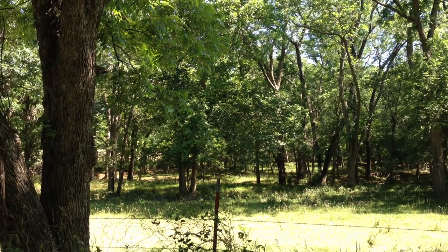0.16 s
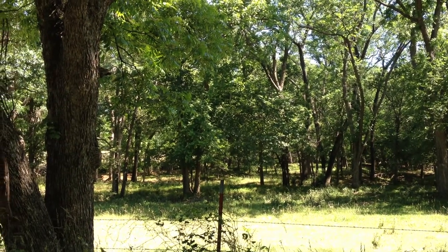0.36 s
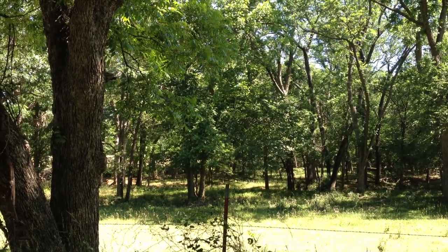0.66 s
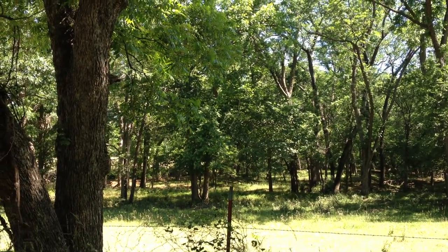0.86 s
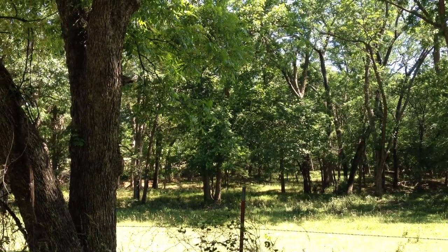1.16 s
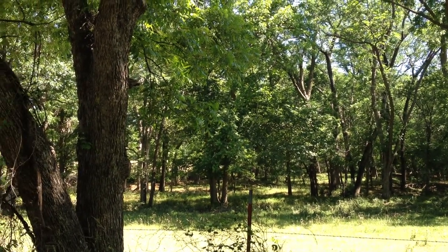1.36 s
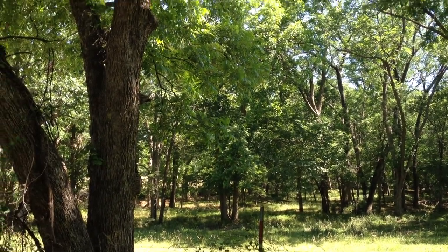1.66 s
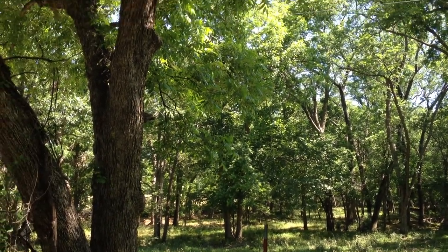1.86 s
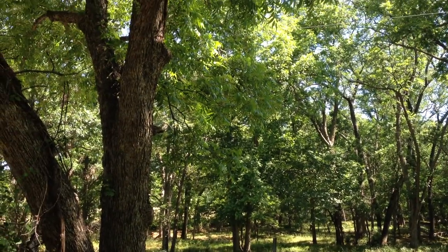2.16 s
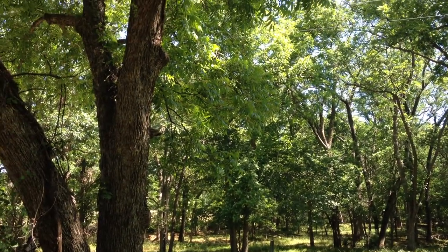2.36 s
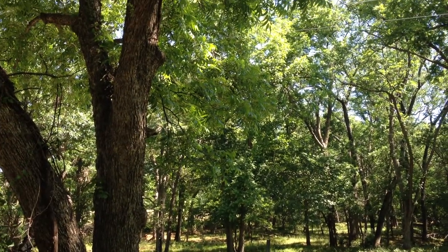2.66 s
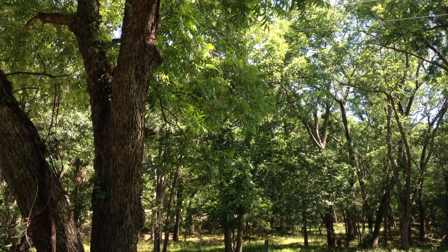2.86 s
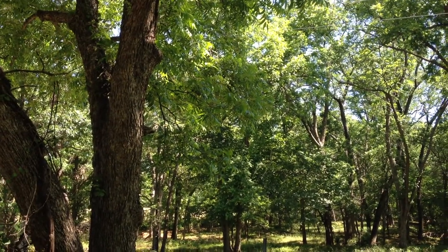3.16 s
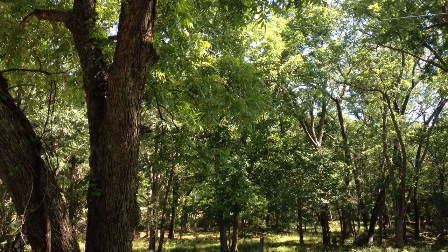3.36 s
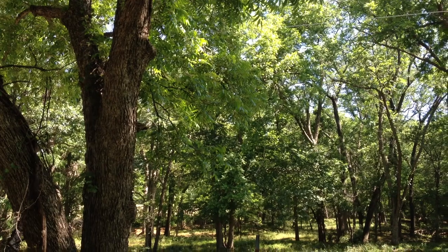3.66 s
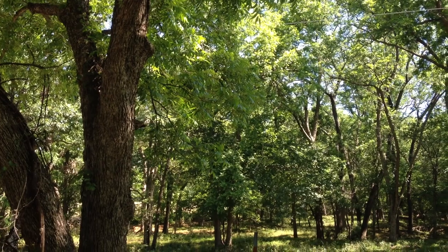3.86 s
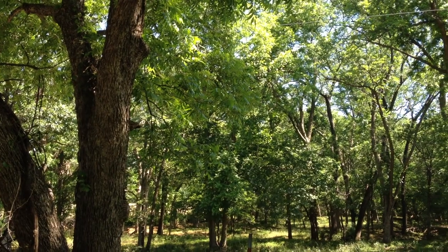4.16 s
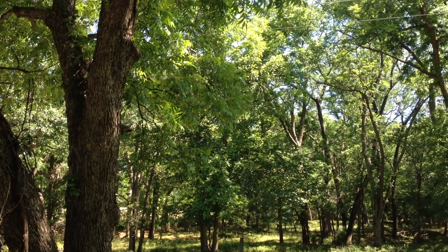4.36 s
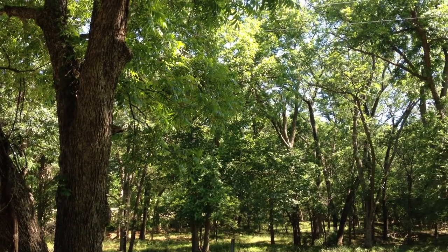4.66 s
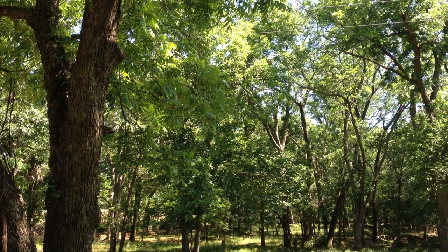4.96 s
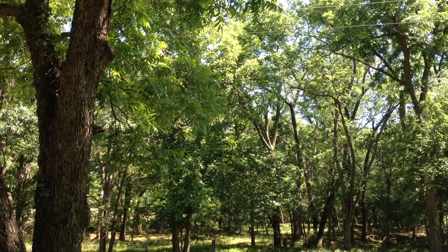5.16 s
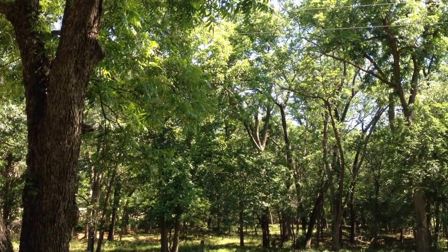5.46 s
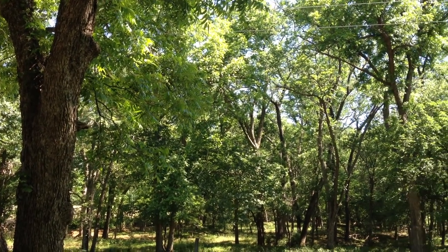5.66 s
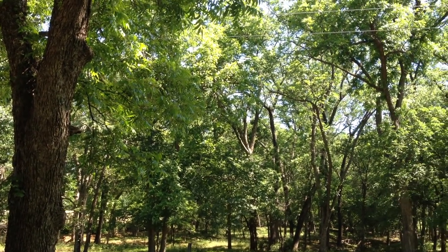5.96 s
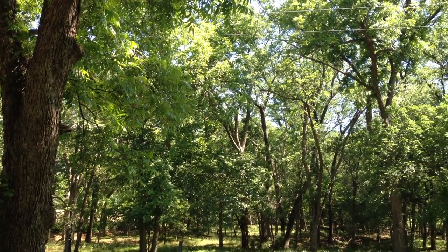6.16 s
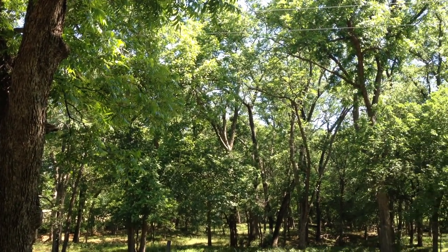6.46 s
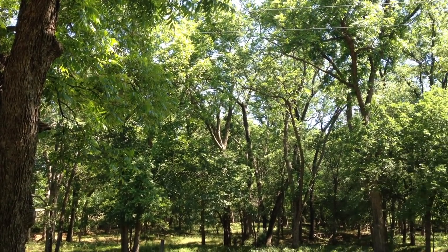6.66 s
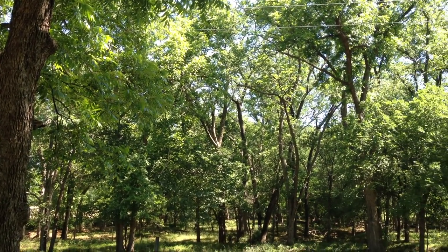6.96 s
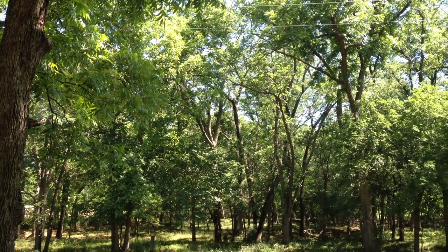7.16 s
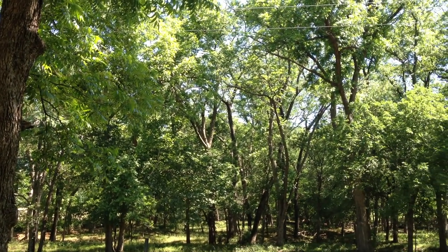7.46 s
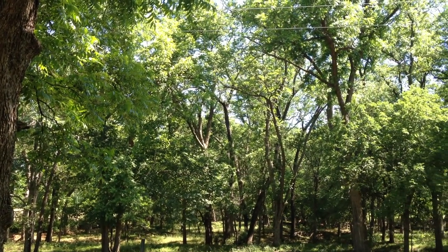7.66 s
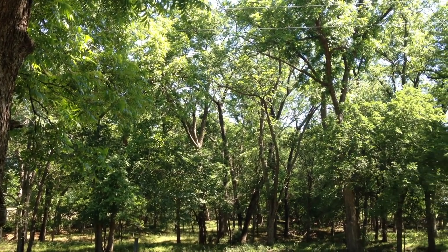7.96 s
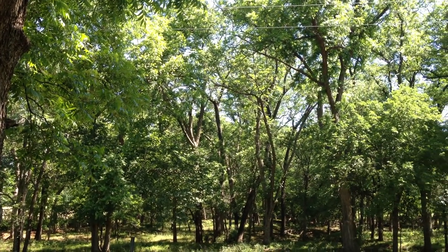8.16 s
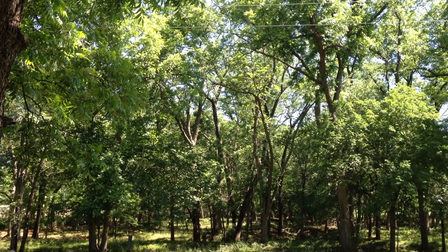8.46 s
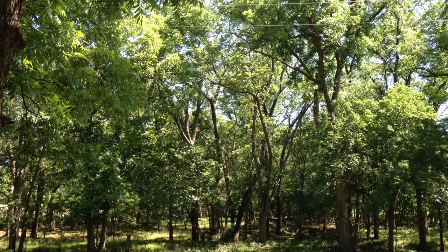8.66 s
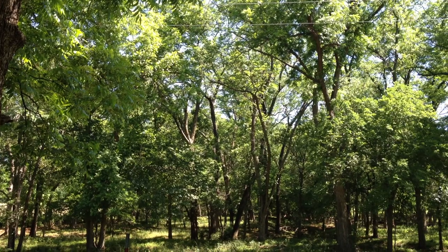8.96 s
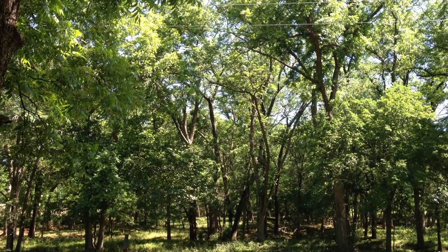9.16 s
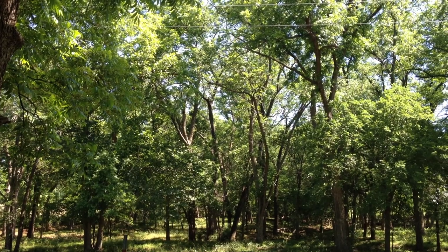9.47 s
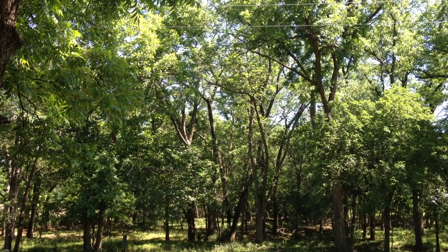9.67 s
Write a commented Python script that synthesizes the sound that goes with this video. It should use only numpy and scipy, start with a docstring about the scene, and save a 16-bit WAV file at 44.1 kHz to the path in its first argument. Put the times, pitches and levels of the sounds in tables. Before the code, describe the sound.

A massed chorus of cicadas fills a sunny wood with a dense, bright hiss. It starts low in a lull, swells slowly to a crest near four seconds, drops away within about a second, then builds again to a crest near nine and starts fading. Very quiet still air lies beneath. Small dull thuds and ticks from a hand on the camera sound close to the microphone, most noticeably around four to six seconds.

```python
"""Cicada chorus in waves

Periodical cicadas sing in the trees of an open wood; the whole chorus swells and fades about every five seconds.
Hundreds of ribbed membranes click; leaves smear the clicks into a hiss near 6 kHz with an overtone near 12 kHz.
Under it lies a quiet bed of still air and distant rumble, made of filtered noise.
A hand shifts on a camera's shell: short damped rings make faint thuds and ticks, and one small high tick."""
import sys
import numpy as np
from scipy import signal
from scipy.fft import rfft, irfft
from scipy.io import wavfile
from scipy.ndimage import uniform_filter1d

SR = 44100
rng = np.random.default_rng(int(sys.argv[2]) if len(sys.argv) > 2 else 0)


def dump_mix(stems):
    """Bounce the given channels to the path in sys.argv[1] as a 16-bit WAV at rate SR."""
    frames = np.atleast_2d(stems).T  # one column per channel
    limited = np.clip(frames, -1, 1)  # hard clip at full scale
    pcm = np.round(limited * 32767).astype(np.int16)
    wavfile.write(sys.argv[1], SR, pcm)


N = 432180  # length in samples

# waves of the chorus: crest_s, swell_s, crest_level_db, overtone_rise_db (above its lull)
CHORUS_WAVES = [(-1.19, 3.5, -20, 3), (4.08, 3.7, -21.2, 2.1), (9.14, 3.1, -21.7, 3.5)]
TREES, SINGERS = 12, 25  # trees, and singers in each


def gain_of(db):
    """Decibels to an amplitude factor."""
    return 10 ** (np.asarray(db) / 20)


def evened(x):
    """Scale to an RMS of one."""
    return x / np.sqrt(np.mean(x ** 2) + 1e-20)


def read(points, hz):
    """Read a spectral curve in dB between its points, along a logarithmic pitch axis."""
    point_hz, value_db = np.transpose(points)
    return np.interp(np.log(hz + 1), np.log(point_hz + 1), value_db)


def tymbals(clicks_per_s, spread_db, bout_s, bout_db):
    """The singers of one tree: each clicks at its own uneven rate and strength, in bouts that come and go."""
    rate, near, bout, phase = rng.random((4, SINGERS, 1))
    gap, size = rng.standard_normal((2, SINGERS, 4000))
    singer_rate = clicks_per_s * (.8 + .4 * rate)
    click_s = np.cumsum(np.exp(.3 * gap), 1) / singer_rate
    bout_cycles = click_s / (bout_s * (.5 + bout)) + phase
    loud_db = spread_db * near + bout_db * np.sin(2 * np.pi * bout_cycles)
    clicks = np.sign(size) * gain_of(loud_db)  # random polarity
    heard = click_s < N / SR
    return np.bincount((click_s[heard] * SR).astype(int), clicks[heard], N)


def leaves(x, t60, rise_s, direct_db):
    """Scattering among leaves and trunks smears every click; the leaves stir, so the path renews each 0.2 s."""
    size = SR // 5
    t = np.arange(size) / SR
    moments = np.pad(x, (0, -N % size)).reshape(-1, size)
    envelope = gain_of(-60 * t / t60) * (1 - np.exp(-t / rise_s))
    tails = rng.standard_normal(moments.shape) * envelope
    tails /= np.linalg.norm(tails, axis=1, keepdims=True)
    smeared = irfft(rfft(moments, 2 * size) * rfft(tails, 2 * size))
    smeared[1:, :size] += smeared[:-1, size:]  # each tail rings on into the next moment
    return gain_of(direct_db) * x + smeared[:, :size].ravel()[:N]


def wave(t, crest_s, swell_s):
    """A long steady swell from 0 to 1, then a quick fade that steepens."""
    fade_s, swell_bend, fade_bend = 1.3, 1.3, 1.7
    swell = np.clip(1 - (crest_s - t) / swell_s, 0, 1) ** swell_bend
    return swell * (1 - np.clip((t - crest_s) / fade_s, 0, 1) ** fade_bend)


def level(t):
    """Level of the song in dB, lifted from the lull by each wave as singers join and drop out together."""
    lull_db = -31.0
    return lull_db + sum((db - lull_db) * wave(t, s, swell_s) for s, swell_s, db, _ in CHORUS_WAVES)


def chorus():
    """The blurred clicks take the colour of the insects' bodies, which shifts between trough and crest."""
    # colour of the song at the crest of a wave: pitch_hz, density_db (per Hz, relative)
    song_colour = [(1200, -64), (1800, -46.5), (3010, -29.5), (3950, -10.5), (5450, -3.5), (6260, 2),
                   (6750, -1), (7670, -13), (8610, -14.5), (9700, -33.5), (11000, -24.5), (12500, -24.5),
                   (14100, -39.5), (15200, -39.5)]
    # added in a trough, where the flanks stand higher against the main band: pitch_hz, lift_db
    trough_lift = [(1500, 11), (3000, 3.5), (4500, 6), (6300, 3), (8500, 3.5), (12000, 6.5), (15000, 6)]
    crest_db, trough_db = -22, -31  # song levels at which the colour is fully crest or trough
    overtone_lull_db, overtone_lag_s = -1.2, .15  # the overtone crests a little after the main band

    # every tree has its own path through the wood
    clicks = np.zeros(N)
    for _ in range(TREES):
        tree = tymbals(clicks_per_s=220, spread_db=7.5, bout_s=.4, bout_db=2)
        clicks += leaves(tree, t60=.12, rise_s=0.0031, direct_db=-3.5)

    hz, t, spectrum = signal.stft(clicks, SR, nperseg=512, noverlap=384)
    hz = hz[:, None]
    overtone_db = overtone_lull_db + sum(db * wave(t - overtone_lag_s, s, swell_s)
                                         for s, swell_s, _, db in CHORUS_WAVES)
    overtone_band = np.clip((hz - 9000) / 1200, 0, 1)
    crest = np.clip((level(t) - trough_db) / (crest_db - trough_db), 0, 1)
    colour_db = read(song_colour, hz) + (1 - crest) * read(trough_lift, hz) + overtone_db * overtone_band
    # equal power at each moment, so that level() alone sets the waves
    colour = gain_of(colour_db) / np.linalg.norm(gain_of(colour_db), axis=0)

    # slow, faint patches of louder and softer colour
    patches = uniform_filter1d(rng.standard_normal(spectrum.shape), 7, 0)
    patches = uniform_filter1d(patches, 30, 1)
    coloured = spectrum * colour * gain_of(0.58 * evened(patches))
    song = evened(signal.istft(coloured, SR, nperseg=512, noverlap=384)[1][:N])
    return song * gain_of(level(np.arange(N) / SR))


def air():
    """Still air and distant rumble as filtered noise; the low end is lumpy, as the fingers shift on the shell."""
    # colour of the bed: pitch_hz, density_db (per Hz, relative)
    air_colour = [(20, -9), (60, -4.5), (140, -4), (180, 2), (220, -1.5), (306, -4.5), (600, -8),
                  (1350, -9.5), (2500, -12.5), (16000, -22)]
    hz, t, spectrum = signal.stft(rng.standard_normal(N), SR, nperseg=1024, noverlap=768)
    lumps = evened(uniform_filter1d(rng.standard_normal(len(t)), 4))
    lumps_db = 2.8 * lumps * np.exp(-hz / 500)[:, None]  # weaker towards the treble
    spectrum = spectrum * gain_of(read(air_colour, hz)[:, None] + lumps_db)
    bed = evened(signal.istft(spectrum, SR, nperseg=1024, noverlap=768)[1][:N])
    return gain_of(-70) * bed


def ring(modes, rise_s):
    """Dying vibrations after one soft push: a sum of sines, each with its own decay."""
    t = np.arange(4000) / SR
    tones = sum(gain_of(db - 60 * t / t60) * np.sin(2 * np.pi * hz * t) for hz, db, t60 in modes)
    return tones * (1 - np.exp(-t / rise_s))


def fidgets():
    """Faint shifts of the fingers, scattered in time and strength, as rows like those of the grip."""
    count, thud_db, tick_db, spread_db, contact_ms = 11, -62, -69, 2.5, .7
    when = rng.random(count)
    chance = rng.standard_normal((count, 2))
    return [(.01 + s * (N / SR - .2), thud_db + spread_db * a, tick_db + spread_db * b, contact_ms)
            for s, (a, b) in zip(when, chance)]


def grip():
    """Each shift of the hand thuds in the shell and ticks in its joints; a longer contact is duller."""
    # the clearest shifts of the hand: contact_s, thud_db, tick_db, contact_ms
    shifts = [(0.22, -59, -68, 0.6), (0.9974, -55, -60, 0.7), (1.3741, -54.5, -64, 0.5),
              (1.68, -53, -61, 0.6), (1.7704, -58, -55.5, 0.5), (2.03, -51.5, -55, 0.5),
              (3.486, -57, -55, 0.8), (3.509, -50, -53, 0.6), (3.6513, -57, -65, 0.3),
              (3.911, -72, -46.5, 1.5), (4.1441, -54, -61, 1.1), (4.2344, -42, -42.5, 0.96),
              (4.662, -52, -51, 1.4), (4.73, -72, -55, 1.3), (4.8755, -53, -44, 0.36),
              (5.331, -55, -60, 1.1), (5.346, -54, -47.5, 0.35), (5.3588, -66, -57, 0.6),
              (5.7152, -55, -56, 0.8), (5.743, -66, -55.5, 0.3), (5.9133, -54, -45, 0.25),
              (6.0276, -57, -50.5, 0.38), (6.9433, -58, -64, 0.6), (7.8305, -54, -62, 1.1),
              (7.8623, -50, -48, 1.1), (8.294, -56, -65, 1.1), (8.8278, -60, -62, 0.3),
              (9.146, -57, -59, 0.6)]
    # what a thud rings with: pitch_hz, level_db, t60_s
    shell_modes = [(189, -1, 0.038), (290, -0.5, 0.029), (477, -3.5, 0.014)]
    # what a tick rings with: pitch_hz, level_db, t60_s
    joint_modes = [(556, 3, 0.008), (406, -11.5, .03), (880, 4.5, 0.0046), (1370, 0, 0.0055),
                   (1900, -13, .004)]
    thud = ring(shell_modes, rise_s=0.00043)
    tick = ring(joint_modes, rise_s=.0001)
    tick = signal.lfilter(*signal.butter(2, 280, "high", fs=SR), tick)  # a small joint radiates no bass

    out = np.zeros(N)
    t = np.arange(-100, 101) / SR
    for s, thud_db, tick_db, contact_ms in [*shifts, *fidgets()]:
        contact_s = max(contact_ms, .05) / 1000
        push = np.exp(-.5 * (4 * t / contact_s) ** 2)  # a bell-shaped press
        sound = gain_of(thud_db) * thud + gain_of(tick_db) * tick
        pressed = np.convolve(sound, push / push.sum())[:len(sound)]
        out[int((s + t[0]) * SR):][:len(sound)] += pressed
    return out


def twig():
    """A small high tick: one short damped ring."""
    # the tick: start_s, level_db, pitch_hz, t60_s
    snaps = [(5.7848, -46, 2290, 0.017)]
    out = np.zeros(N)
    for s, db, hz, t60 in snaps:
        snap = ring([(hz, db, t60)], rise_s=.002)
        out[int(s * SR):][:len(snap)] += snap
    return out


def scene():
    """Chorus, air, grip and twig summed to one channel."""
    return (chorus() + air() + grip() + twig())[None]


def record(dry):
    """The microphone's bass cut and the faint noise of its amplifier, then the band limit of the recorder."""
    bass_cut_hz, edge_hz, noise_db = 110, 15310, -90.5
    thin = signal.sosfilt(signal.butter(4, bass_cut_hz, "high", fs=SR, output="sos"), dry)
    # noise that falls away above 120 Hz
    noise = signal.lfilter([1], [1, -np.exp(-2 * np.pi * 120 / SR)], rng.standard_normal(N))
    heard = thin + gain_of(noise_db) * evened(noise)
    band_limit = signal.firwin(1023, edge_hz, window=("kaiser", 9), fs=SR)
    return signal.oaconvolve(heard, band_limit[None], "same")


dry = scene()
out = record(dry)
dump_mix(out)
```